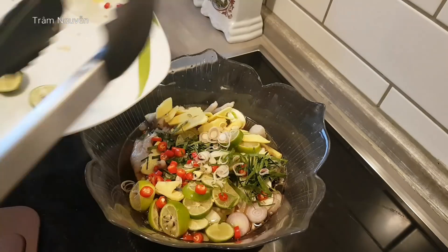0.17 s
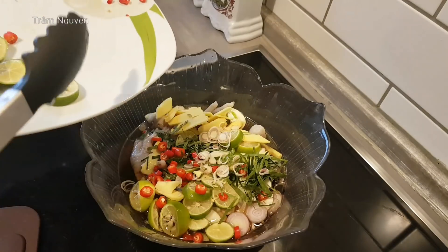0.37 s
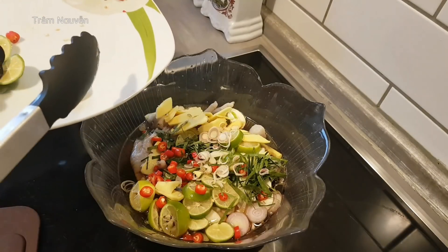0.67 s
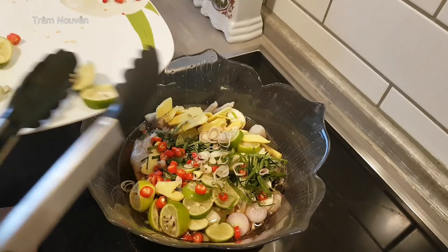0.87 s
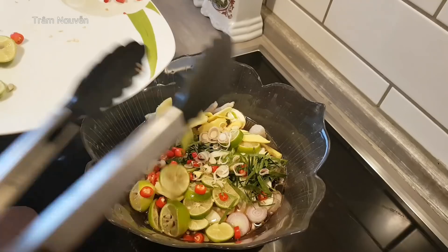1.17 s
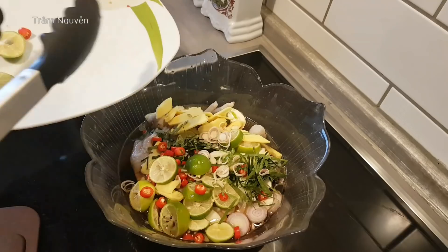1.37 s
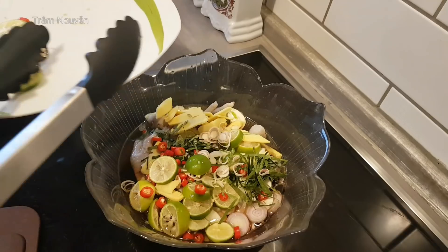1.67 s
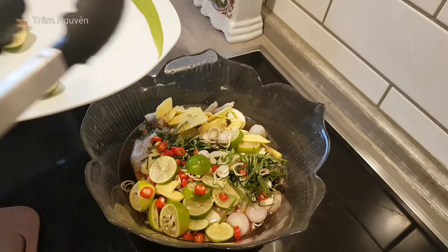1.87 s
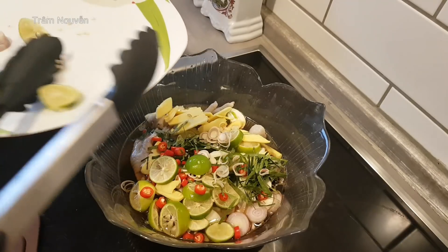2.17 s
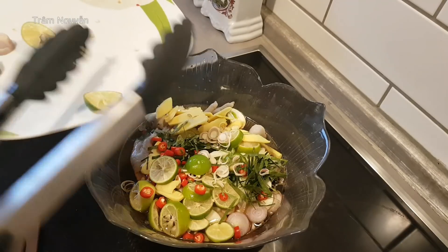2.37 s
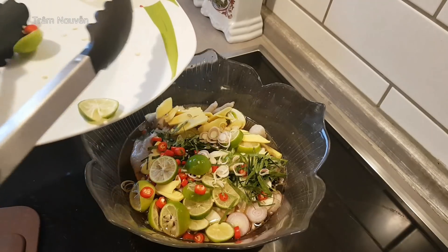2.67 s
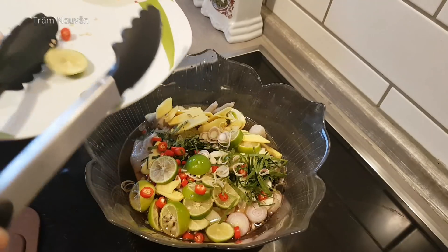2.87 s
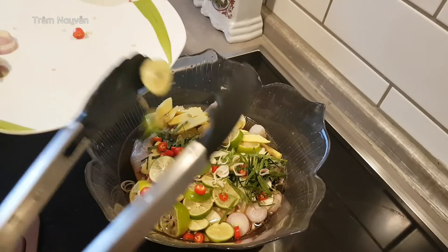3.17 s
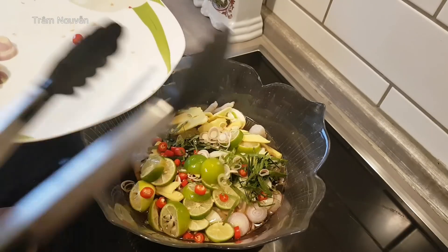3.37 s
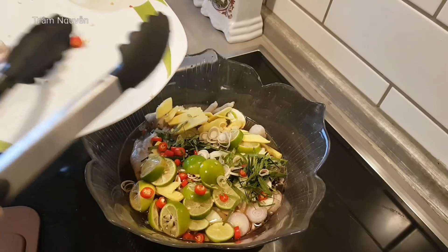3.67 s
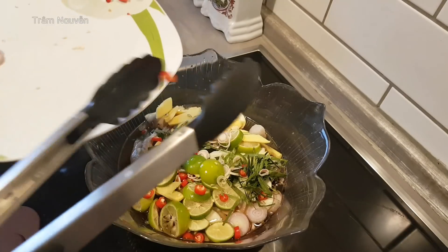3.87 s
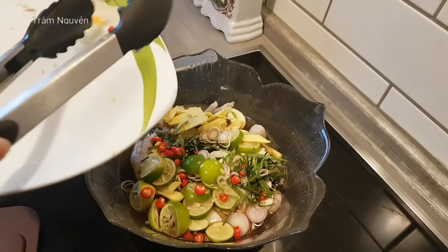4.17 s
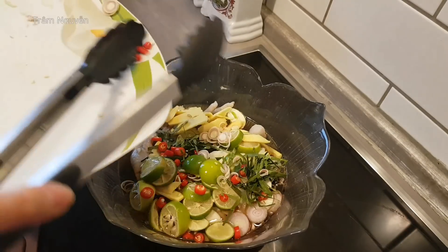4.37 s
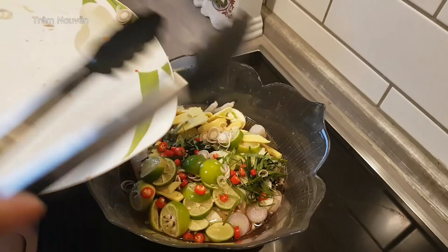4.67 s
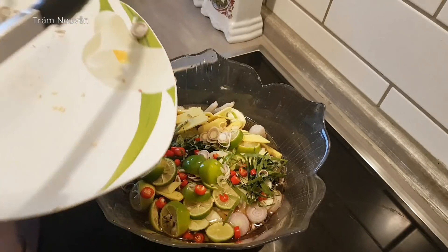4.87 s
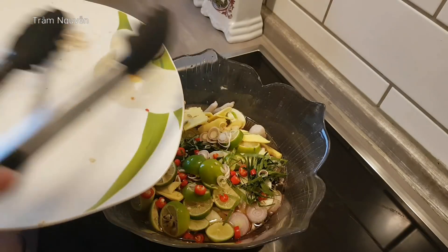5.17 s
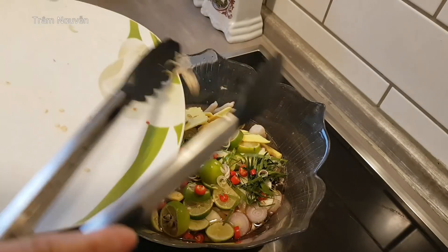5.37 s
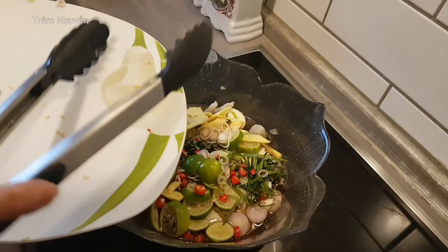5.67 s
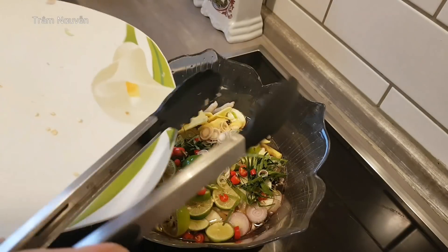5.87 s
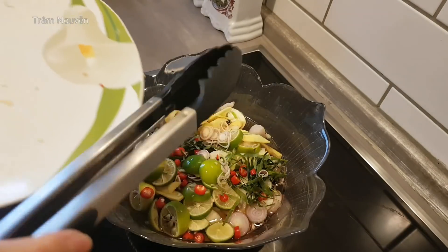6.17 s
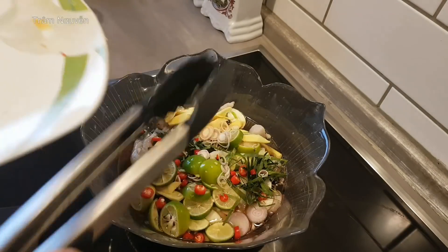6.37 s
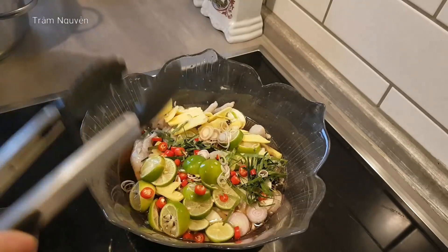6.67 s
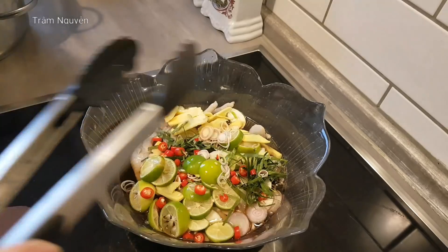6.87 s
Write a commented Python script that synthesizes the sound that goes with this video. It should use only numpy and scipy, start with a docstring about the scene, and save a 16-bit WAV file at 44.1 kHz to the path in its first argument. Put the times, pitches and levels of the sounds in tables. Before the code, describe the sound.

Close, dry clicks and gritty scrapes of kitchen tongs on a damped ceramic plate come in spaced groups above a very quiet appliance hum.

```python
"""Kitchen tongs push lime halves off a hand-held ceramic plate into a glass bowl, close to a stereo microphone pair.
The tips knock and rub, mostly on the plate: clicks and stick-slip jolts drive damped modes, noise makes crack and scrape.
The steel arms tick faintly as short resonances; soft low thuds are decaying sines.
Feedback delays answer as a small tiled kitchen; shaped noise makes an appliance hum, rumble and hiss."""
import sys
import numpy as np
from scipy import signal
from scipy.fft import rfft, irfft, next_fast_len
from scipy.io import wavfile

SR = 44100
rng = np.random.default_rng(int(sys.argv[2]) if len(sys.argv) > 2 else 0)


def output_pcm(signal):
    """Save a mono or channel-first signal as 16-bit PCM at the path in sys.argv[1].

    Samples are clipped to [-1, 1] before scaling.
    """
    pcm = np.clip(np.atleast_2d(signal).T, -1, 1) * 32767
    wavfile.write(sys.argv[1], SR, np.round(pcm).astype(np.int16))


N = 309422   # length in samples

# Appliance and quiet floor: hiss colour, columns corner_hz, relative_level_db (per Hz)
FLOOR_COLOUR = [(65, -31), (110, -6), (124, -7), (191, -12), (255, -15.5), (313, -16.5), (444, -18.5),
                (472, -16.5), (821, -18.5), (8000, -34), (12800, -35.5), (14800, -27.5)]
FLOOR_DB = -67.5
# Narrow noise bands of the hum: centre_hz, width_hz, rms_level_db
HUM_BANDS = [(99.2, 2.3, -72), (184, 13, -82.5), (314, 27, -78.5), (446, 21, -82), (4040, 55, -90.5),
             (11640, 630, -87)]
# How alike left and right are: pitch_hz, likeness (0 to 1)
LIKENESS = [(60, .9), (130, .75), (290, .25), (640, .1), (1400, .001)]
# Swells of the low rumble: peak_s, peak_db (added to the steady rumble)
RUMBLE_SWELLS = [(0.0, -65), (0.6, -69.5), (1.17, -69), (1.48, -59.5), (2.5, -68.5), (3.67, -59),
                 (4.85, -76), (5.73, -69), (6.9, -67)]
RUMBLE_DB, SWELL_RISE_DB_PER_S, SWELL_FALL_DB_PER_S = -79, 100.5, 52

# Ticks of the steel arms: start_s, relative_level_db
ARM_TICKS = [(1.2775, -66), (1.3186, -72), (1.789, -70), (1.88, -45), (1.975, -47), (2.2833, -47),
             (2.293, -73), (2.384, -38), (2.431, -43.5)]
# Resonances of the arms: pitch_hz, relative_level_db, t60_s
ARM_MODES = [(5184, -10.5, 0.02), (7600, -10, 0.047), (10630, -7, .04), (13000, -8, .02)]
ARM_TRIM_DB, ARM_CLICK_GAIN = -14, 2.4
BRUSH_DB, BRUSH_T60_S = -73, 0.081   # each tick comes with a faint brushing hiss

# Tips dragged over the glaze, one curve a stroke: time_s, hiss_db (before the catches)
STROKES = [
    [(1.51, -90), (1.534, -70.5), (1.6, -95)],
    [(2.46, -47.5), (2.538, -65), (2.57, -59.5), (2.66, -97)],
    [(3.01, -63), (3.126, -69.5), (3.212, -75), (3.266, -58), (3.314, -68.5), (3.4, -73.5), (3.42, -53)],
    [(3.51, -37), (3.554, -55.5), (3.7, -88.5)],
    [(3.96, -56.5), (4.036, -54.5), (4.114, -66.5), (4.198, -67.5), (4.264, -93)],
    [(4.55, -47), (4.686, -58.5), (4.722, -48), (4.754, -54), (4.79, -36.5), (4.816, -53.5), (4.84, -59.5),
     (4.92, -82)],
    [(5.315, -51.5), (5.366, -67), (5.488, -53), (5.528, -61.5), (5.566, -41), (5.612, -65.5), (5.678, -77)],
    [(5.69, -62.5), (5.71, -44.5), (5.744, -64.5), (5.82, -78)],
    [(6.03, -53), (6.066, -39), (6.104, -65), (6.118, -38)],
    [(6.13, -44), (6.148, -31.5), (6.17, -47), (6.272, -78), (6.36, -83.5)],
    [(6.425, -47), (6.485, -74.5), (6.495, -72), (6.56, -83.5)],
]
# Colour of the sliding hiss: corner_hz, relative_level_db (per Hz)
FRICTION_COLOUR = [(240, -59), (400, -16.5), (1070, -21.5), (1660, -9), (1880, -4.5), (2580, -2),
                   (9370, -8.5), (13500, -9), (15000, -23.5)]
SLIPS_PER_S, SLIP_SPREAD_DB = 3700, 2.5
CATCHES_PER_S, CATCH_DB, CATCH_SPREAD_DB, CATCH_T60_S = 90, -2.0, 2.5, .04
# After each knock the tip skids; levels against the knock's crack level
SKID_RING_DB, SKID_HISS_DB, SKID_T60_S = -30.5, -27, .07

# Knocks of the tips, mostly on the plate; the tap at 6.418 s is probably on the glass bowl:
# start_s, crack_db, ring_db (both relative), low_modes_extra_db, high_modes_tilt_db_per_octave,
# left_over_right_db, favoured_hz, favoured_hz (two modes at the touched spot),
# ring_time_share (of the free t60, under the press of tip and hand), rubbed_ring_db (against the hiss)
KNOCKS = [(1.4675, -45.5, -55.5, 10, 0.5, -9, 1210, 3440, 0.59, -4),
          (1.542, -74, -60.5, 5, -3, 1.5, 1720, 2370, 0.48, -4),
          (2.4506, -9, -28.5, -45, 7, 0.5, 1450, 2600, 0.62, 0.5),
          (2.5138, -43, -43.5, -22, 1.5, -20, 1485, 2470, 0.76, 3),
          (2.5635, -57, -54.5, 12, 4.5, 4, 1600, 3920, 0.63, 1),
          (2.997, -25.5, -30.5, -34, -0.5, 0, 1470, 4120, 0.53, 9),
          (3.058, -60, -50.5, 10, 3, 0, 1420, 2550, 0.38, 11),
          (3.1651, -43, -48.5, -24, 0, -3, 1221, 2540, 0.67, 0),
          (3.2652, -47, -51.5, 16.5, -4, -1.5, 880, 2500, 0.54, 2),
          (3.3626, -58, -51.5, 21.5, -5, -4.5, 1336, 2630, 0.85, 15.5),
          (3.427, -25.5, -28.5, 4, -1, -0.5, 822, 3440, 0.87, 5),
          (3.4684, -26.5, -27.5, 1.5, 1.5, 1.5, 1690, 2410, 0.95, 5),
          (3.5042, -17, -20.5, -34, 5.5, 3.5, 1660, 1430, 0.56, 8.5),
          (3.6215, -53, -43.5, 7, -4, -6, 1220, 2340, 0.22, 14),
          (3.645, -47.5, -57, -9, -1, -5.5, 1660, 2550, 0.45, 11),
          (3.9457, -13, -26, -31, 5, -1, 1510, 2720, 0.59, 2.5),
          (3.9606, -44, -30.5, -28, -19, -13.5, 1430, 5650, 0.73, 5),
          (4.0341, -43, -39.5, -36, 2, -2, 1474, 4200, 0.58, -4),
          (4.1918, -59, -53, 6, -4, 4, 1530, 2570, 1, -4.5),
          (4.5363, -9, -46, 9, 10.5, -2, 1560, 2870, 1, -5.5),
          (4.599, -60, -57, -12, 1, 6, 1595, 2616, 0.65, 8.5),
          (4.699, -62, -44.5, 0, 4, 3, 1430, 1680, 0.72, 4.5),
          (4.7653, -35, -51, -8, 9.5, 14, 1420, 3530, 1, -4),
          (4.771, -42, -44.5, -15, 12, -11, 1224, 3370, 0.78, 10.5),
          (4.785, -18.5, -17.5, -1, -2, 1, 712, 3470, 0.65, 11.5),
          (4.8344, -58, -29.5, 6, 1, -4, 711, 3590, 0.72, 16),
          (5.3044, -23.5, -29.5, 4, 4, -0.5, 1640, 2710, 0.59, 3.5),
          (5.3982, -39, -48, 7, 2.5, 1.5, 1380, 2600, 1, -3), (5.43, -47, -57.5, 5, 9, 0, 830, 3980, 1, 1),
          (5.477, -38, -60.5, -10, 14.5, 12, 1770, 4000, 0.69, -4),
          (5.5474, -26, -42, -25, 6, -5.5, 1644, 1740, 0.96, 4),
          (5.7, -48, -37, -2, 4, 2, 1230, 2540, 0.91, 2),
          (5.7159, -52, -38.5, -5.5, 6, -8, 828, 2645, 0.86, 7.5),
          (6.0027, -8, -28, -13, 8, -1.5, 1470, 2680, 0.51, 2.5),
          (6.049, -52, -48.5, -15, 14, -4, 1570, 1640, 1, 2),
          (6.115, -51, -42, -12, 3, -7, 1320, 7780, 1, 16),
          (6.1207, -12.5, -14, -4, -3.5, 1.5, 1221, 3478, 0.98, 6),
          (6.126, -30.5, -16, -12, 4, -6, 1442, 1221, 0.45, 12.5),
          (6.1413, -26, -17, -0.5, 2, -0.5, 830, 2616, 0.97, 7),
          (6.4182, -20.5, -56, 28.5, 16, -2, 3160, 4500, 0.39, -6.5),
          (6.4947, -45, -79, 17, 17, 3, 1680, 4670, 0.6, -10)]
(KNOCK_S, KNOCK_CRACK_DB, KNOCK_RING_DB, LOW_EXTRA_DB, HIGH_TILT_DB, KNOCK_LEFT_DB,
 _, _, RING_SHARE, RUBBED_RING_DB) = np.array(KNOCKS).T
FAVOURED_HZ = np.array(KNOCKS)[:, 6:8]
# Plate modes in the hand: pitch_hz, free_t60_s
PLATE_MODES = [(325, .06), (560, .05), (712, .16), (807, .17), (845, .09), (1221, .06), (1434, .16),
               (1484, .11), (1559, .08), (1660, .14), (1686, .1), (2370, .08), (2503, .12), (2616, .13),
               (2745, .06), (2870, .08), (3160, .05), (3422, .07), (3478, .12), (3986, .11), (4043, .1),
               (4410, .1), (4700, .06), (5430, .09), (5540, .08), (5790, .1), (6560, .09), (7780, .07),
               (8780, .05), (10600, .05)]
# How loudly each of these modes sounds: relative level_db
PLATE_MODE_DB = [-15.5, -12, -12.5, -10, -10, -0.5, 1.5, -2.5, -6, -6, -3.5, -4, -6.5, -2, -10, -12, -9.5,
                 -7, -8, -2.5, -12, -7, -17.5, -5.5, -16.5, -5.5, -11.5, -20.5, -23.5, -26.5]
MIDDLE_MODE_HZ, TOP_MODE_HZ = 1500, 5800   # tilt runs between these; low modes lie an octave under the first
RING_DB, SPOT_SPREAD_DB = -9.5, 2.0
SIDE_SPREAD_DB, SIDE_TURN_RAD = 5.0, 2.0
FAVOUR_DB, FAVOUR_WIDTH = 8, .03   # widths as shares of the pitch
RUB_FAVOUR_DB, RUB_FAVOUR_WIDTH = 11, .035
WAVER_DB, WAVER_PER_S = 2.5, 50

# Colour of the contact sound: corner_hz, relative_level_db (per Hz)
CRACK_COLOUR = [(120, -49), (200, -11), (2090, -13.5), (2750, 1), (6880, -5.5), (8420, -3), (9400, -10),
                (13800, 0.5), (16000, -33.5)]
CRACK_DB, CRACK_T60_S, CRACK_LEFT_DB = -11.5, 0.021, 5   # left over right, on top of each knock's own
SNAP_DB = 16.5   # snap against the starting level of the burst

# Soft low bumps: start_s, starting_level_db, pitch_hz, t60_s
THUDS = [(1.469, -48.5, 96.4, 0.41), (1.619, -46, 99, 0.07), (2.197, -58.5, 100, 0.28),
         (3.626, -45, 102.8, 0.19), (5.717, -58.5, 94, 0.18)]

RIGHT_LAG_S = .00027
KITCHEN_T60_S, WALL_CUT_HZ, KITCHEN_DB = .26, 9000, -22   # t60 of the lows; the treble dies sooner
TREBLE_STEP_HZ, TREBLE_STEP_DB, CUTOFF_HZ = 14600, -20, 16780


def from_db(db):
    """Gain of a level in dB."""
    return 10 ** (np.asarray(db) / 20)


def rms_one(x):
    """Scale to rms 1."""
    return x / np.sqrt(np.mean(x ** 2) + 1e-20)


def at_hz(points, hz):
    """Read a table on a log-frequency axis."""
    table_hz, values = np.array(points).T
    return np.interp(np.log(hz), np.log(table_hz), values)


def samples(times):
    """Sample index of each event in the left and the later right channel."""
    arrivals_s = np.asarray(times) + [[0], [RIGHT_LAG_S]]
    return np.clip(np.round(arrivals_s * SR).astype(int), 0, N - 1)


def coloured(x, spectrum):
    """Minimum-phase filter with the given dB per Hz, so that nothing sounds early; energy 1."""
    hz = np.maximum(np.fft.rfftfreq(4096, 1 / SR), 1)
    cepstrum = irfft(np.log(from_db(at_hz(spectrum, hz))))
    # fold the cepstrum forward in time
    cepstrum[1:2048] *= 2
    cepstrum[2049:] = 0
    taps = irfft(np.exp(rfft(cepstrum)))[:2048]
    taps /= np.sqrt(np.sum(taps ** 2))
    return signal.fftconvolve(x, taps[None], axes=1)[:, :N]


def decay(clicks, t60):
    """Each click jumps up and dies away exponentially."""
    return signal.lfilter([1], [1, -from_db(-60 / (t60 * SR))], clicks + 1e-18)


def dying(times, levels_db, t60):
    """Envelope that jumps at each time and dies away."""
    clicks = np.zeros(N)
    np.add.at(clicks, samples(times)[0], from_db(levels_db))
    return decay(clicks, t60)


def mode_pole(hz, t60):
    """One-pole resonator: turns at the pitch while it shrinks."""
    return from_db(-60 / (t60 * SR)) * np.exp(2j * np.pi * hz / SR)


def ring(drive, hz, t60):
    """A damped mode: every jolt of the drive sets a sine ringing."""
    return signal.lfilter([1], [1, -mode_pole(hz, t60)], drive + 1e-18).imag


def alike_noise(likeness):
    """White stereo noise with a shared part."""
    mid, side = rng.standard_normal((2, N))
    alike = np.clip(likeness, 0, 1)
    shared = np.sqrt(1 + alike) * mid
    opposed = np.sqrt(1 - alike) * side * np.array([[1], [-1]])
    return (shared + opposed) / np.sqrt(2)


def waver(spread_db, per_s):
    """Smooth random gain, own in each channel."""
    knots = from_db(spread_db * rng.standard_normal((2, 400)))
    position = np.arange(0, N, 32) / SR * per_s
    coarse = np.array([np.interp(position, np.arange(400), k) for k in knots])
    return np.repeat(coarse, 32, axis=1)[:, :N]


def rumble_gain():
    """A steady level with swells that rise fast and fall slowly."""
    t, gain = np.arange(0, N, 256) / SR, from_db(RUMBLE_DB)
    for peak_s, peak_db in RUMBLE_SWELLS:
        drop_db = np.maximum(SWELL_RISE_DB_PER_S * (peak_s - t), SWELL_FALL_DB_PER_S * (t - peak_s))
        gain = gain + from_db(peak_db - drop_db)
    return np.interp(np.arange(N) / SR, t, gain)


def floor():
    """Coloured hiss, band-passed rumble and an appliance hum of narrow noise bands that waver by themselves."""
    # the bass is more alike left and right than the rest
    low_pass = signal.butter(2, 220, fs=SR, output="sos")
    high_pass = signal.butter(2, 220, "high", fs=SR, output="sos")
    bass = signal.sosfilt(low_pass, alike_noise(at_hz(LIKENESS, 130)))
    rest = signal.sosfilt(high_pass, alike_noise(at_hz(LIKENESS, 1400)))
    out = from_db(FLOOR_DB) * coloured(bass + rest, FLOOR_COLOUR)
    rumble_band = signal.butter(2, [40, 85], "band", fs=SR, output="sos")
    rumble = signal.sosfilt(rumble_band, alike_noise(at_hz(LIKENESS, 60)))
    out += rumble_gain() * rms_one(rumble)
    for hz, width_hz, level_db in HUM_BANDS:
        t60 = np.log(1000) / (np.pi * width_hz)   # a narrow band rings long
        out += from_db(level_db) * rms_one(ring(alike_noise(at_hz(LIKENESS, hz)), hz, t60))
    return out


def arms():
    """Faint ticks: a bare click plus the short high resonances it sets off in the steel arms."""
    clicks, ticks = np.zeros((2, N)), np.array(ARM_TICKS)
    at = samples(ticks[:, 0])
    for ch in range(2):
        clicks[ch, at[ch]] = from_db(ticks[:, 1] + ARM_TRIM_DB)
    ringing = sum(from_db(level_db) * ring(clicks, hz, t60) for hz, level_db, t60 in ARM_MODES)
    return ARM_CLICK_GAIN * clicks + ringing


def strokes():
    """Envelope of all the drags, each silent outside its own curve."""
    t, total = np.arange(N) / SR, np.zeros(N)
    for stroke in STROKES:
        times_s, levels_db = np.array(stroke).T
        total += from_db(np.interp(t, times_s, levels_db, left=-200, right=-200))
    return total


def skids(offset_db):
    """Envelope of the short skid after every knock."""
    return dying(KNOCK_S, KNOCK_CRACK_DB + offset_db, SKID_T60_S)


def catches():
    """Gain that jumps at random times as a dragged tip catches on rough spots; rms 1."""
    chance = rng.random((1000, 2))
    times = np.cumsum(-np.log(1 - chance[:, 0])) / CATCHES_PER_S
    levels_db = CATCH_DB - CATCH_SPREAD_DB * np.log(1 - chance[:, 1])
    heard = times < N / SR
    return rms_one(1 + dying(times[heard], levels_db[heard], CATCH_T60_S))


def slips():
    """Tiny stick-slip jolts of a tip dragged over glaze, in uneven surges, later on the right; rms 1."""
    sizes = from_db(SLIP_SPREAD_DB * np.minimum(rng.exponential(1, N), 5))
    signs = rng.choice([-1, 1], N)
    happens = rng.random(N) < SLIPS_PER_S / SR
    jolts = sizes * signs * happens * waver(2.5, 45)[0]
    return rms_one(np.array([jolts, np.roll(jolts, round(RIGHT_LAG_S * SR))]))


def friction(grit):
    """Broad hiss of the sliding tips: shared slips plus noise that reaches each microphone by its own path."""
    own = from_db(3.0) * rng.standard_normal((2, N)) * waver(0.66, 40)
    tick_s = np.array(ARM_TICKS)[:, 0]
    envelope = grit * strokes() + skids(SKID_HISS_DB)
    envelope += dying(tick_s, np.full(len(tick_s), BRUSH_DB), BRUSH_T60_S)
    return envelope * coloured(slips() + own, FRICTION_COLOUR)


def favour(hz, top_db, width):
    """Extra dB, for each knock, of a mode near a pitch that the touched spot favours."""
    nearness = np.exp(-.5 * (np.log(hz / FAVOURED_HZ) / width) ** 2)
    return (top_db * nearness).max(axis=1)


def struck_level(hz, chance):
    """Level in dB that each knock gives to one mode."""
    octaves = np.log2(min(hz, TOP_MODE_HZ) / MIDDLE_MODE_HZ)
    level = KNOCK_RING_DB + LOW_EXTRA_DB * np.clip(-octaves, 0, 1) + HIGH_TILT_DB * max(octaves, 0)
    level += SPOT_SPREAD_DB * chance + RING_DB
    return level + favour(hz, FAVOUR_DB, FAVOUR_WIDTH)


def towards_microphones(hz, lean_chance, turn_chance):
    """Complex gain of a mode towards left and right, one pair a knock."""
    lean = from_db(KNOCK_LEFT_DB + SIDE_SPREAD_DB * lean_chance)
    shares = np.sqrt(2 / (1 + lean ** 2)) * np.array([lean, np.ones_like(lean)])   # same power at any lean
    apart = SIDE_TURN_RAD * min(hz / 1000, 1) * turn_chance   # long waves reach both microphones alike
    return shares * np.exp(1j * np.array([[.5], [-.5]]) * apart)


def ring_held(force, hz, t60, starts):
    """A mode whose ring time changes at every knock while its motion carries on."""
    edges, state, out = [0, *starts, N], np.zeros((2, 1), complex), []
    for a, b, share in zip(edges, edges[1:], [1, *np.clip(RING_SHARE, .15, 1.5)]):
        pole = mode_pole(hz, t60 * share)
        part, state = signal.lfilter([1], [1, -pole], force[:, a:b] + 1e-18, zi=state)
        out.append(part.imag)
    return np.concatenate(out, axis=1)


def plate(grit):
    """All knocks and slides drive the same modes; each radiates unevenly towards the two microphones."""
    at, out = samples(KNOCK_S), np.zeros((2, N))
    chance = rng.standard_normal((len(KNOCKS), len(PLATE_MODES), 3))
    # tips rub where they last knocked
    spot = np.maximum(np.searchsorted(at[0], np.arange(N), side="right") - 1, 0)
    dragged = from_db(RUBBED_RING_DB)[spot] * strokes()
    rubbing = slips() * (grit * dragged + skids(SKID_RING_DB))
    for k, ((hz, t60), level_db) in enumerate(zip(PLATE_MODES, PLATE_MODE_DB)):
        struck = from_db(struck_level(hz, chance[:, k, 0]))
        towards = towards_microphones(hz, chance[:, k, 1], chance[:, k, 2])
        rubbed = from_db(favour(hz, RUB_FAVOUR_DB, RUB_FAVOUR_WIDTH))
        rubbed *= np.sqrt(3 / (t60 * SR))   # offsets the longer build-up of slow-dying modes
        force = rubbing * (rubbed * towards)[:, spot]
        for ch in range(2):
            np.add.at(force[ch], at[ch], struck * towards[ch])
        # the plate moves in the hand, so each ring swells and dips; neighbouring modes have opposite sign
        gain = (-1) ** k * from_db(level_db) * waver(WAVER_DB, WAVER_PER_S)
        out += gain * ring_held(force, hz, t60, at[0])
    # keeps the onsets of the rings free of low thumps
    return signal.sosfilt(signal.butter(3, 260, "high", fs=SR, output="sos"), out)


def cracks():
    """The contact itself: a snap and a broad burst of noise that dies within some 20 milliseconds."""
    clicks, at = np.zeros((2, N)), samples(KNOCK_S)
    for ch, side in enumerate((.5, -.5)):
        level_db = KNOCK_CRACK_DB + CRACK_DB + side * (CRACK_LEFT_DB + KNOCK_LEFT_DB)
        np.add.at(clicks[ch], at[ch], from_db(level_db))
    burst = decay(clicks, CRACK_T60_S) * rng.standard_normal((2, N))
    snap = -from_db(SNAP_DB) * clicks
    return coloured(burst + snap, CRACK_COLOUR)


def thuds():
    """Low bumps: decaying sines, the same in both channels."""
    out = np.zeros(N)
    for start_s, level_db, hz, t60 in THUDS:
        start = int(start_s * SR)
        t = np.arange(min(SR // 2, N - start)) / SR
        envelope = from_db(level_db - 60 * t / max(t60, .02))
        out[start:][:len(t)] += envelope * np.sin(2 * np.pi * hz * t)
    return out


def kitchen(x):
    """Room echoes: eight feedback delays a side, duller on every round."""
    size = next_fast_len(N + SR)
    cycles = np.fft.rfftfreq(size)   # per sample
    pole = np.exp(-2 * np.pi * WALL_CUT_HZ / SR)
    dull = (1 - pole) / (1 - pole * np.exp(-2j * np.pi * cycles))
    echoes = np.zeros((2, len(cycles)), complex)
    lags = (rng.uniform(0.0036, .03, 16) * SR).astype(int)
    for k, lag in enumerate(lags):
        loss = from_db(-60 * lag / SR / KITCHEN_T60_S)
        loop = loss * dull * np.exp(-2j * np.pi * cycles * lag)
        echoes[k % 2] += (-1) ** (k // 2) * loop / (1 - loop)
    return irfft(echoes * rfft(x, size), size)[:, :N]


def scene():
    """Near sounds and their echoes, with the thuds and the floor."""
    grit = catches()
    near = plate(grit) + cracks() + friction(grit) + arms()
    return near + from_db(KITCHEN_DB) * kitchen(near) + thuds() + floor()


def record(dry):
    """The highest treble steps down, then is cut."""
    step = signal.ellip(8, .5, 50, TREBLE_STEP_HZ, fs=SR, output="sos")
    stepped = signal.sosfilt(step, dry) + from_db(TREBLE_STEP_DB) * dry
    return signal.sosfilt(signal.cheby2(12, 70, CUTOFF_HZ, fs=SR, output="sos"), stepped)


dry = scene()
out = record(dry)
output_pcm(out)
```